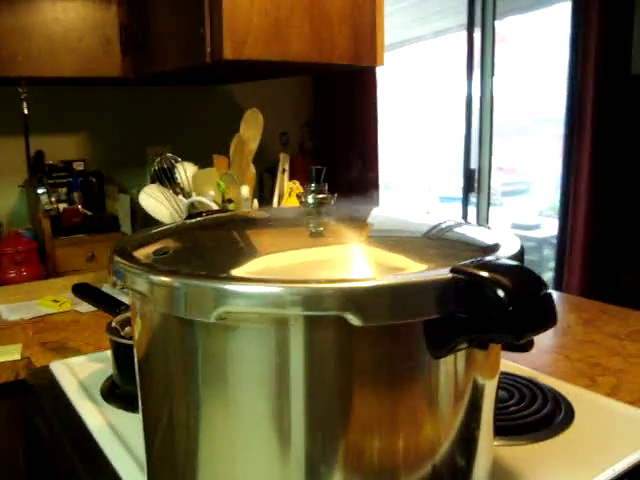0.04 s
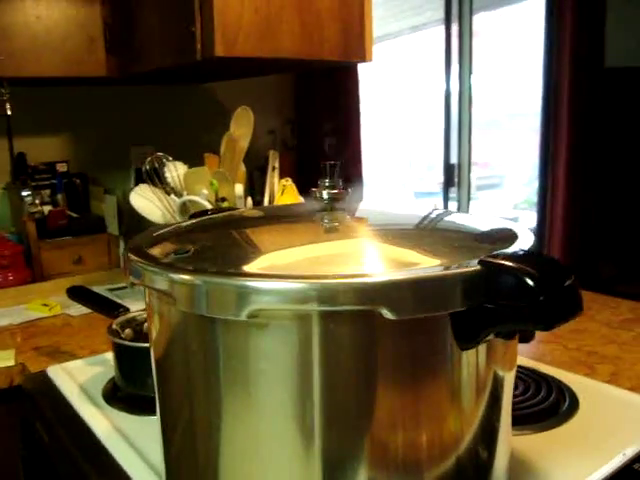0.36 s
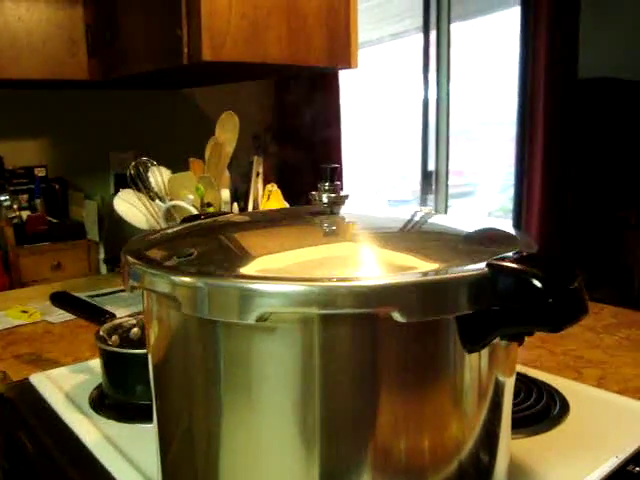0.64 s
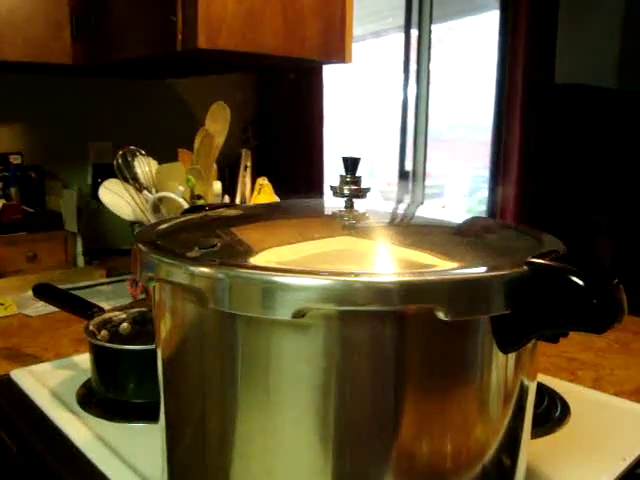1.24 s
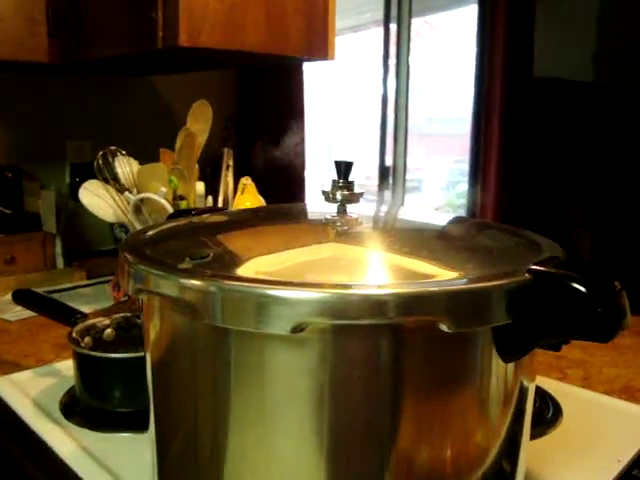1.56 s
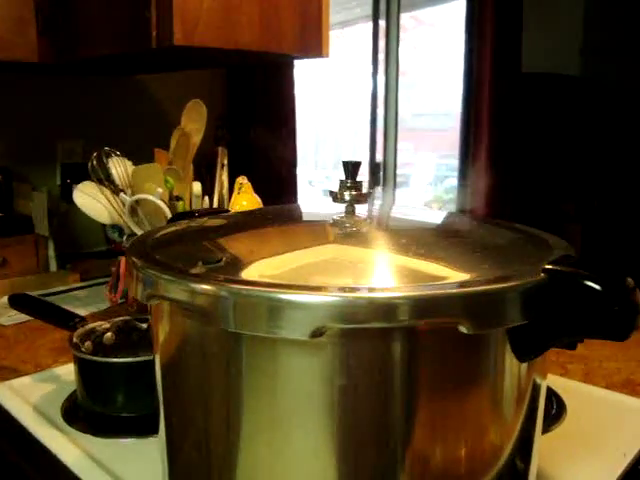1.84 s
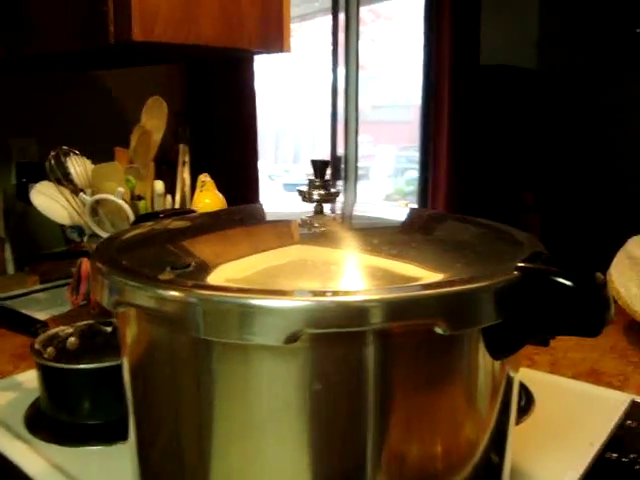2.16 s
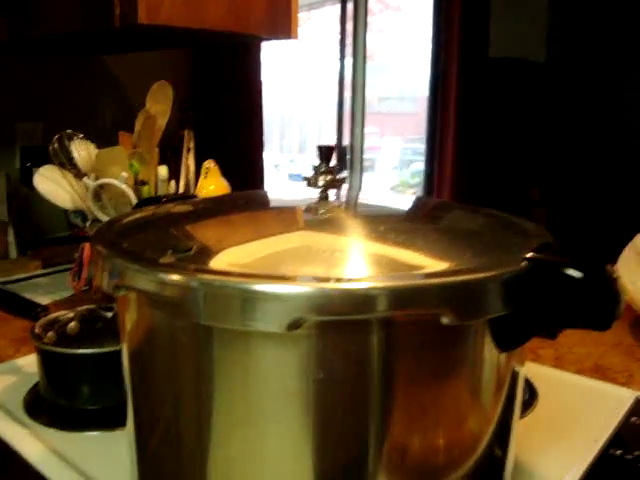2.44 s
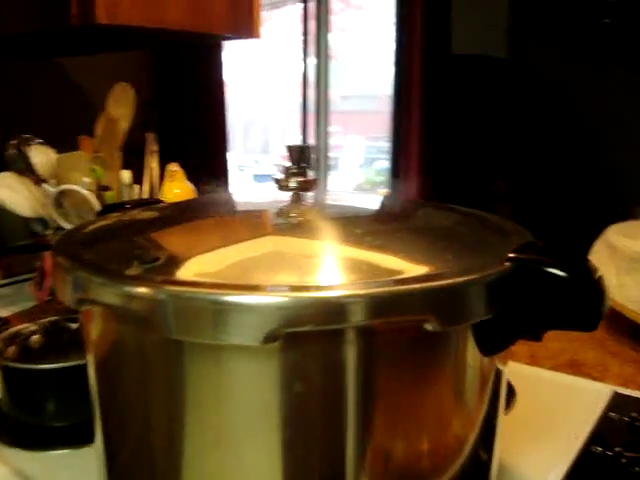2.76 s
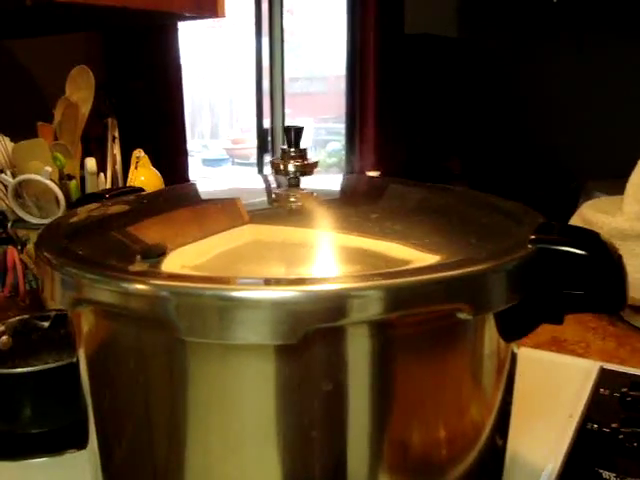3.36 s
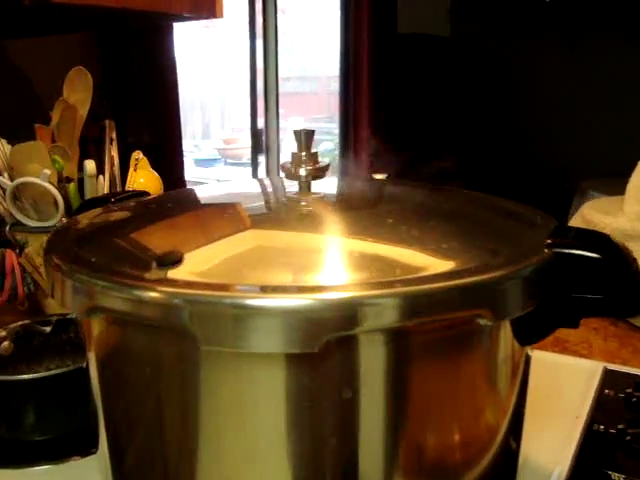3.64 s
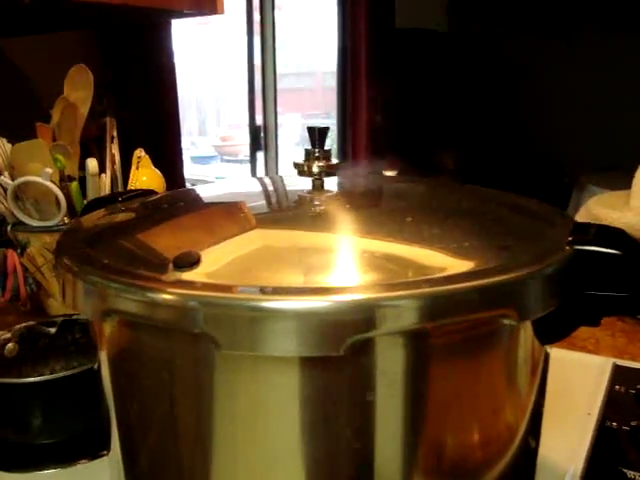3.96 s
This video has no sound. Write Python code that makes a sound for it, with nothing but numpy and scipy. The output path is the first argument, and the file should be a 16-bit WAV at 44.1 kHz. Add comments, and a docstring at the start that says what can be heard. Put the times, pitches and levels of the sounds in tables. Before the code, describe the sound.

Steam hisses loudly from a pressure canner on a kitchen stove, sputtering quickly as the rocking weight pinches the jet. The weight rattles and clinks on the metal lid throughout, over faint boiling, heard from nearby.

```python
"""From the start, steam hisses from under the rocking weight of a pressure canner on a kitchen stove,
over the boiling pot and a faint hum. The hiss echoes off cabinets as the hand-held microphone drifts.
About fifteen times a second the weight tips back and pinches the jet. It chatters lightly on its seat,
and its harder swings knock on the vent and ring the lid.
From about two seconds on, the pot also gives a few low gurgles."""
import sys
import numpy as np
from scipy import signal
from scipy.fft import rfft, irfft, next_fast_len
from scipy.io import wavfile
from scipy.ndimage import uniform_filter1d, map_coordinates

SR = 44100
rng = np.random.default_rng(int(sys.argv[2]) if len(sys.argv) > 2 else 0)


def file_out(sig):
    """Save sig as 16-bit WAV at sys.argv[1]."""
    # one column per channel
    cols = np.atleast_2d(sig).T
    # limit, then scale
    lim = np.clip(cols, -1, 1)
    pcm = np.round(lim * 32767).astype(np.int16)
    wavfile.write(sys.argv[1], SR, pcm)


N = 176400
TIME = np.arange(N) / SR

# Moments when the weight pinches the jet: t/s, depth/dB (each use takes a share of it), length/s
PINCHES = [(.063, 13.5, 0.0084), (0.117, 2, 0.041), (.202, 8, 0.021), (0.27, 1, 0.05), (0.362, 1.5, .027),
           (0.467, 3, 0.027), (0.577, 2.5, 0.028), (0.636, 1, 0.045), (0.774, 12.5, 0.004),
           (.839, 12, 0.0089), (0.905, 8, 0.018), (0.994, 4.5, 0.024), (1.072, 1, 0.051),
           (1.214, 3, 0.0099), (1.278, 3, 0.023), (1.358, 20, 0.01), (1.431, 7, .021), (1.5, 20.5, .013),
           (1.576, 12, 0.011), (1.632, 8, 0.031), (1.702, 6, 0.0067), (1.765, 2, 0.0097),
           (1.847, -0.5, 0.013), (1.905, 5, 0.0099), (1.968, 6, 0.022), (2.033, 5, 0.012),
           (2.103, 5.5, 0.016), (2.254, 12, 0.018), (2.326, 6, 0.019), (2.389, 10, 0.0097),
           (2.458, 5.5, 0.012), (2.522, 5.5, 0.023), (2.66, 7, 0.02), (2.725, 0, 0.055), (2.791, 7.5, 0.01),
           (2.935, 11, 0.0087), (2.993, 8.5, .018), (3.132, 11.5, 0.012), (3.203, 11.5, 0.0088),
           (3.266, 5, 0.013), (3.331, 0.5, 0.01), (3.395, 5, 0.028), (3.46, 9.5, 0.017),
           (3.526, 8.5, 0.0072), (3.59, 11.5, 0.0092), (3.704, 2.5, 0.02), (3.778, 5, 0.013),
           (3.849, 3.5, 0.0073), (3.904, 0.5, 0.0082), (3.978, 4, 0.0094)]
PINCH_EDGE = 1.98  # how steep the sides of a pinch are
OPEN_SPEED = 1.09  # above 1, the gap under the weight opens faster than it closes


def amp(db):
    """Turn decibels into a number to multiply by."""
    return 10 ** (np.asarray(db) / 20)


def unit(x):
    """Scale a signal so that its average strength (rms) is 1."""
    return x / np.sqrt(np.mean(x ** 2) + 1e-20)


def along(points, hz):
    """Read between rows of f/Hz, value, with octaves evenly spaced."""
    f, v = np.transpose(points)
    return np.interp(np.log(hz + 1), np.log(f + 1), v)


def wobble(rate):
    """A smooth curve through `rate` random values a second."""
    return map_coordinates(rng.standard_normal(int(N * rate / SR) + 4), [TIME * rate])


def filtered(x, response):
    """Turn each frequency of x up or down by the gain response(hz)."""
    size = next_fast_len(N + SR // 2)
    return irfft(rfft(x, size) * response(np.fft.rfftfreq(size, 1 / SR)), size)[:N]


def noise(spectrum):
    """Noise of strength 1, shaped by rows of f/Hz, level/dB."""
    return unit(filtered(rng.standard_normal(N), lambda hz: amp(along(spectrum, hz))))


def bumps(events, t, edge, skew):
    """A smooth hill for each row of t/s, height/dB, length/s; skew above 1 makes its end the quicker."""
    return sum(db * np.exp2(-np.abs(2 * (t - s) / length * skew ** np.sign(t - s)) ** edge)
               for s, db, length in events)


def steam():
    """Swirling steam makes a hiss, and the vent's resonances colour it."""
    # Tone of the hiss: f/Hz, level/dB
    spectrum = [(180, -52), (300, -32), (414, -25), (445, -28.5), (515, -18), (765, -19), (873, -14),
                (1190, -11), (1350, -16), (1900, -12.5), (2850, -5.5), (3610, -5), (4910, 0.5), (8680, 0),
                (9900, -3), (12900, -94), (21800, -120)]
    # Narrow bands that the vent lifts or lowers: f/Hz, width/Hz, lift/dB
    resonances = [(1480, 90, 3), (2920, 250, 0.5), (3950, 240, 2), (4220, 39, 4.5), (4470, 56, 3.5),
                  (5230, 73, 1.5), (5450, 58, 4.5), (6300, 43, 3), (6800, 70, -0.5), (7400, 60, -0.5)]

    def vent(hz):
        return amp(sum(db / (1 + (2 * (hz - centre) / width) ** 2) for centre, width, db in resonances))

    return filtered(noise(spectrum), vent)


def whistle(hiss):
    """The gap half whistles: a narrow resonance wanders as the weight settles on the vent."""
    # Path of the whistle: t/s, f/Hz, lift/dB
    path = [(0, 5090, 1.5), (.45, 5380, 4.5), (.9, 5100, 2.5), (1.2, 4830, 5), (1.45, 5040, 4.5),
            (1.85, 4890, 5.5), (2.2, 5000, 7), (2.7, 4900, 1), (3.2, 4510, -0.5), (3.7, 4730, 4.5)]
    width_hz = 130
    times, pitch, lift = np.transpose(path)
    hz, t, bands = signal.stft(hiss, SR, nperseg=1024)
    off_pitch_hz = hz[:, None] - np.interp(t, times, pitch)
    lift_db = np.interp(t, times, lift) / (1 + (2 * off_pitch_hz / width_hz) ** 2)
    return signal.istft(bands * amp(lift_db), SR, nperseg=1024)[1][:N]


def jet():
    """The steam jet flutters; pinches make it briefly quieter and duller, spurts make it fuller."""
    # Slow changes in the jet's loudness: t/s, level/dB
    flow = [(0, -19.5), (.7, -20.5), (1.3, -20), (1.8, -20.5), (2.3, -21.5), (2.849, -21.5), (3.301, -21),
            (4, -21)]
    # The weight lifts and lets out a spurt: t/s, rise/dB (before each band's share), length/s
    spurts = [(.17, 1.5, 0.055), (.232, 2.5, 0.027), (.33, 2.5, 0.035), (.795, 2.5, 0.02),
              (.865, 1.5, 0.017), (1.195, 4, .02), (1.322, 1.5, 0.066), (1.39, 2, .035), (1.52, 1.5, 0.051),
              (1.735, 2.5, 0.019), (1.805, 3, 0.022), (2.005, 2.5, .03), (2.145, 1.5, 0.051),
              (2.42, 3.5, 0.013), (2.56, 3, 0.025), (2.83, 4.5, 0.035), (2.95, -0.5, 0.015),
              (3.16, 6, 0.027), (3.55, -1, .03)]
    # How strongly each band follows a spurt: f/Hz, share
    spurt_share = [(400, .1), (1200, 0.63), (3000, 1.24), (5500, 0.51), (9000, 0.27)]
    # How strongly each band follows a pinch: f/Hz, share
    pinch_share = [(400, .1), (1200, 0.3), (3000, 0.66), (6000, 0.72), (8200, 1.68), (9700, 2.9)]
    # How strongly each band flutters: f/Hz, share
    flutter_share = [(500, 2.1), (3000, 1.38), (6000, 1), (8000, 1.52), (9500, 2.45)]
    hz, t, bands = signal.stft(unit(whistle(steam())), SR, nperseg=128)
    hz = hz[:, None]
    # Blur random values across frequency, then time, into small louder and softer patches.
    patches = uniform_filter1d(rng.standard_normal(bands.shape), size=7, axis=0)
    patches = unit(uniform_filter1d(patches, size=9, axis=1))
    tremble = np.interp(t, TIME, wobble(rate=130))
    flutter_db = along(flutter_share, hz) * (0.9764 * patches - 0.01 * tremble)
    spurt_db = along(spurt_share, hz) * bumps(spurts, t, edge=1.9, skew=1 / OPEN_SPEED)
    pinch_db = along(pinch_share, hz) * bumps(PINCHES, t, PINCH_EDGE, OPEN_SPEED)
    hiss = signal.istft(bands * amp(spurt_db - pinch_db + flutter_db), SR, nperseg=128)[1][:N]
    return hiss * amp(np.interp(TIME, *np.transpose(flow)))


def boil():
    """Water boils in the pot with a low, slightly uneven rush."""
    # Tone of the boiling: f/Hz, level/dB
    spectrum = [(25, -2.5), (60, -6.5), (120, -1.5), (200, 2), (350, 4.5), (450, 0.5), (530, 6.5),
                (700, 15), (1000, -22), (2000, -25)]
    level_db = -56.5 + 0.73 * wobble(rate=18)
    return amp(level_db) * noise(spectrum)


def hum():
    """Three faint low tones, each wavering a little in pitch."""
    # Tones of the hum: f/Hz, level at the start/dB, level at the end/dB
    tones = [(115, -81.5, -79.5), (231, -68.5, -72), (419.4, -68, -62)]
    sound = np.zeros(N)
    for hz, first_db, last_db in tones:
        phase = 2 * np.pi * hz * TIME + 0.59 * wobble(rate=10)
        sound += amp(np.linspace(first_db, last_db, N)) * unit(np.sin(phase))
    return sound


def kitchen(sound):
    """Add quick echoes that slide as the microphone moves, and the room's short fading tail."""
    # Echoes off nearby surfaces: delay at the start/ms, delay at the end/ms, gain
    surfaces = [(5.75, 6.05, 0.17), (1.14, 1.496, 0.074), (2.5, 1.9, 0.053), (3.5, 4.4, 0.13),
                (8.1, 8.7, 0.097)]
    # How long the room rings: f/Hz, time to fade by 60 dB/s
    fade_times = [(200, 0.16), (2000, 0.59), (10000, 0.067)]
    tail_db = -16
    echoes = np.zeros(N)
    for first_ms, last_ms, gain in surfaces:
        delay = np.linspace(first_ms, last_ms, N) * SR / 1000
        echoes += gain * map_coordinates(sound, [np.arange(N) - delay], order=3)
    hz, t, bands = signal.stft(rng.standard_normal(SR // 2), SR, nperseg=256)
    fade = amp(-60 * t / along(fade_times, hz)[:, None])
    tail = signal.istft(bands * fade, SR, nperseg=256)[1]
    tail /= np.linalg.norm(tail)
    return sound + echoes + amp(tail_db) * signal.fftconvolve(sound, tail)[:N]


def chatter(gains, tones):
    """The weight rattles lightly on its seat and stirs the lid's tones, more so when it tips."""
    tipped_db = bumps(PINCHES, TIME, PINCH_EDGE, OPEN_SPEED)
    contact = rng.standard_normal(N) * amp(0.53 * tipped_db + 4 * wobble(rate=30.6))
    ring = signal.fftconvolve(contact, np.dot(gains, tones))[:N]
    return amp(-48.5) * unit(ring)


def knocks(gains, tones):
    """Each knock of the weight on the vent is a short scrape that rings the lid's tones."""
    # Knocks on the vent: t/s, level/dB (added to base_db)
    hits = [(.078, -6), (.118, 0.5), (0.313, -5), (.757, -5), (0.834, -4.5), (.964, -9), (1.28, -3),
            (1.355, -2.5), (1.563, -0.5), (1.898, -2), (2.106, -3), (2.31, -2.5), (2.388, -0.5),
            (2.446, -4.5), (2.557, -5), (2.653, -4), (2.854, 1.5), (2.931, -5.5), (3.073, -2), (3.263, -3),
            (3.523, -2), (3.588, -.5), (3.929, -16)]
    base_db, scrape_s = -32.5, 0.0074
    t = np.arange(len(tones[0])) / SR
    sound = np.zeros(N + SR)
    for start, db in hits:
        scrape = rng.standard_normal(len(t)) * np.exp(-t / scrape_s)
        ring = sum(gain * unit(signal.fftconvolve(scrape, tone)[:len(t)])
                   for gain, tone in zip(gains, tones))
        ring /= np.std(ring[:SR // 40])  # the first 25 ms set the strength
        sound[round(start * SR):][:len(t)] += amp(base_db + db) * ring
    return sound[:N]


def lid():
    """The lid rings with its own fading tones under the weight's chatter and knocks."""
    # The lid's natural tones: f/Hz, level/dB, time to fade by 60 dB/s
    modes = [(852, -9.5, 0.095), (908, -1, 0.1), (1123, -2.5, 0.096), (1163, 0, 0.072), (1231, -2, 0.099),
             (1700, 0.5, .14), (2610, -17.5, .06)]
    # How well the lid passes sound to the air (little bass): f/Hz, level/dB
    to_air = [(100, -43.5), (400, -17.5), (740, -11.5), (850, -1.5), (1750, -3.5), (2000, -8.5), (4000, -6)]
    t = np.arange(SR // 4) / SR
    tones = [np.sin(2 * np.pi * hz * t) * amp(-60 * t / fade_s) for hz, _, fade_s in modes]
    gains = [amp(db) for _, db, _ in modes]
    shaking = knocks(gains, tones) + chatter(gains, tones)
    return filtered(shaking, lambda hz: amp(along(to_air, hz)))


def gurgles():
    """The water in the pot gurgles: brief swells of low noise."""
    # Gurgles in the pot: t/s, level/dB, length/s
    events = [(2.212, -62, 0.079), (2.3, -61.5, .05), (2.773, -67, 0.036), (3.92, -61.5, 0.097)]
    # Tone of a gurgle: f/Hz, level/dB
    spectrum = [(120, -28), (170, -0.5), (200, 5.5), (240, 0), (320, -34.5)]
    swells = sum(amp(db) * np.exp2(-(2 * (TIME - s) / length) ** 2) for s, db, length in events)
    return swells * noise(spectrum)


def scene():
    """The jet with its kitchen echoes, plus the lid, the hum and the pot, in one channel."""
    return (kitchen(jet()) + lid() + hum() + gurgles() + boil())[None]


def record(dry):
    """Cut away the very highest treble."""
    top_hz = 10080
    return filtered(dry[0], lambda hz: hz < top_hz)[None]


dry = scene()
out = record(dry)
file_out(out)
```